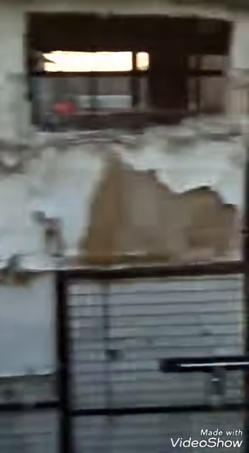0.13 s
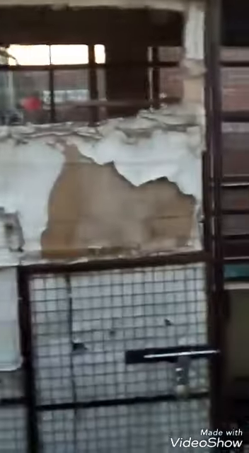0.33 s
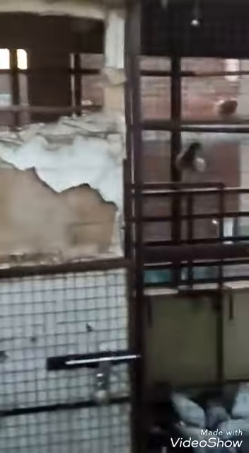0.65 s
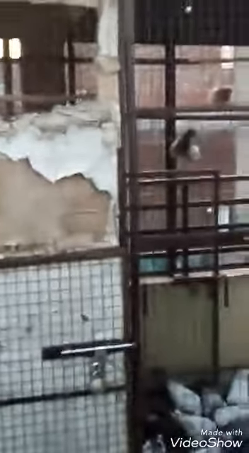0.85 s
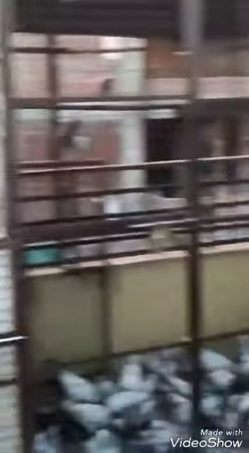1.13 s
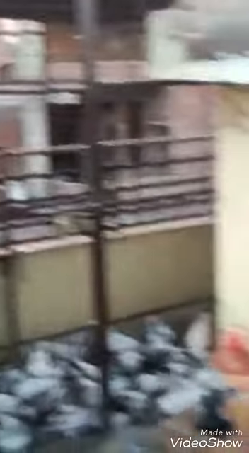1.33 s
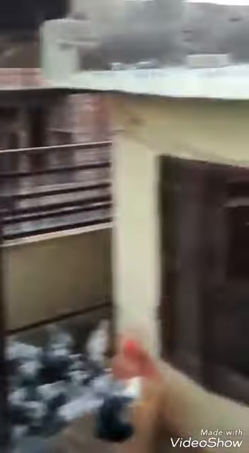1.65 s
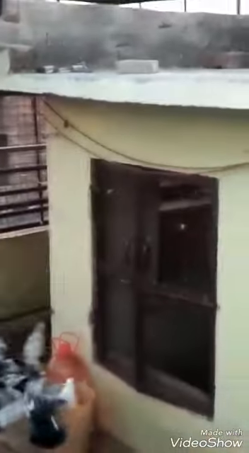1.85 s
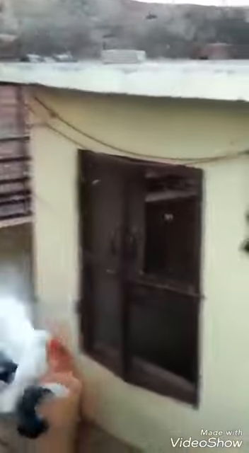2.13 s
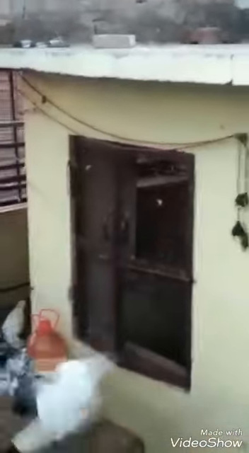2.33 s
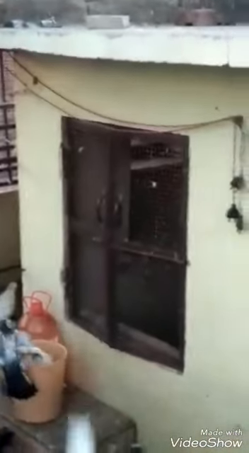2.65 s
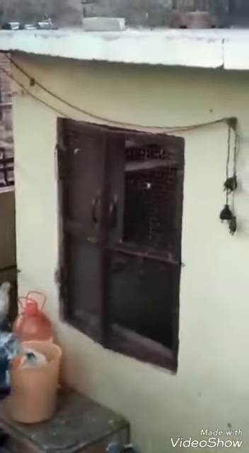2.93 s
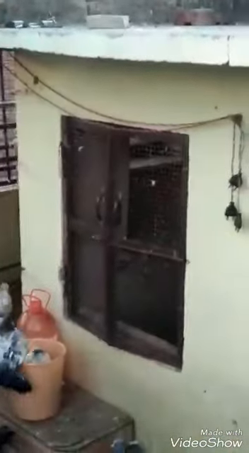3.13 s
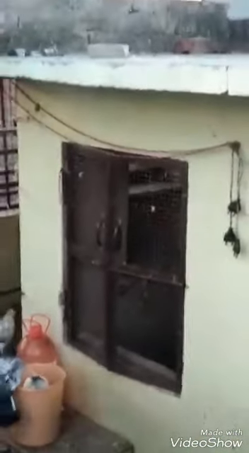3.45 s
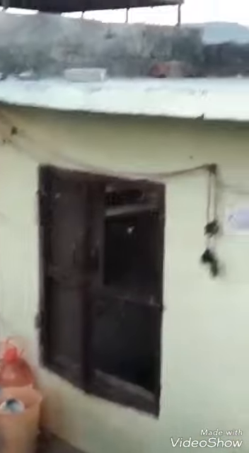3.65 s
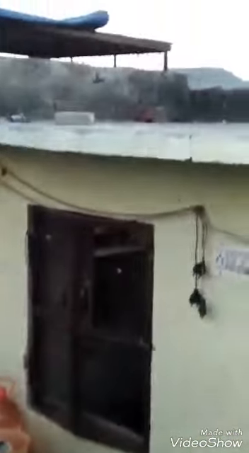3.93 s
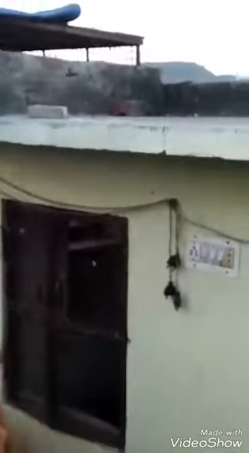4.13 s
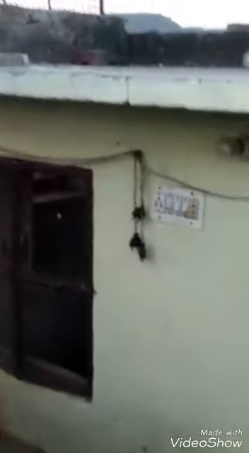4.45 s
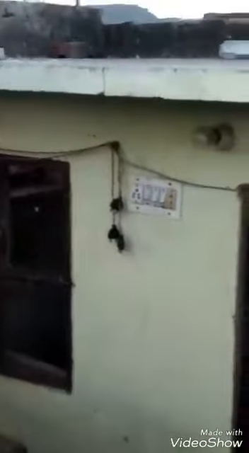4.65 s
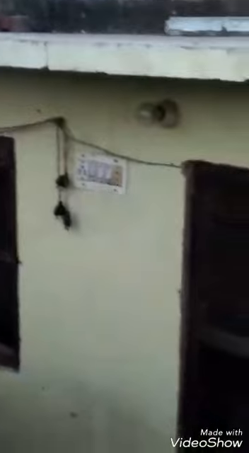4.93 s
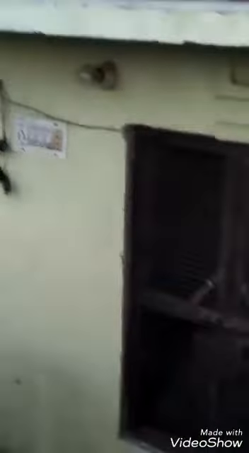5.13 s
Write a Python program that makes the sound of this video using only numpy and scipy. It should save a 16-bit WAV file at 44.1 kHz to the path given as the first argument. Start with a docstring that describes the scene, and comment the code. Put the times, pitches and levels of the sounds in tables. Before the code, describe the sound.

On a walled roof terrace, a pigeon utters a throbbing coo at about half a second, then a hoarser, quieter one near two seconds amid metallic ticks and wing beats. Light wing claps follow. A third coo comes with more flapping, and a last, loudest coo closes the clip. Soft murmur and town rumble lie behind; a handheld microphone catches low air thumps.

```python
"""Pigeons cooing on a walled roof terrace: four throbbing coos, built from one oscillator let through in throbs.
Single throbs, short gliding tones and beak rasps join them. Wing claps are shaped noise, with flutter and ticks;
their downstrokes push single low swings of air at the microphone. Stick-slip scrapes ring a piece of metal.
Behind lie a throbbing murmur, rustling feathers and the noise of the town, with echoes off the walls."""
import sys
import numpy as np
from scipy import signal
from scipy.fft import rfft, irfft, next_fast_len
from scipy.io import wavfile

SR = 44100
rng = np.random.default_rng(int(sys.argv[2]) if len(sys.argv) > 2 else 0)


def generate_wav(signal):
    """Clip the signal to [-1, 1] and save it as 16-bit WAV at the path in sys.argv[1]."""
    frames = np.transpose(np.atleast_2d(signal))
    scaled = np.clip(frames, -1, 1) * 32767
    pcm = np.round(scaled).astype(np.int16)
    wavfile.write(sys.argv[1], SR, pcm)


N = 233685
TIME = np.arange(N) / SR

# Levels in the tables stand before the trims in the functions; colours are relative, as noise is set to rms 1.
# coos of the nearest birds: start_s, loudest_s, end_s, level_db, rise_db, pitch_hz, first_throbs_per_s,
#   quickening_per_s2, top_throbs_per_s, throb_length_s, roughness (0-1), wheeze_db, creak_hz, glide_hz_per_s
COO_ROWS = [(0.549, 0.831, 1.151, -21.5, 13, 334, 30.6, 38, 48, 0.01595, 0.45, -27.5, 98, -44.5),
            (1.98, 2.19, 2.485, -29, 10, 350, 26.9, 77, 29, 0.029, 0.93, -21, 142, -41),
            (3.405, 3.784, 4.08, -23.5, 10, 321.9, 15.3, 68, 42, 0.019, 0.21, -54, 119.6, -24.5),
            (4.922, 5.25, 5.74, -14, 10, 344.6, 18.1, 60, 32.7, .015, 0.33, -51.5, 98.64, 40)]
# effort arch of a coo: it rises, levels off and sinks by FADE_DB
FADE_DB, RISE_SHAPE, FADE_SHAPE = 16.5, 1.935, 1.373
# per dB of slack, a throb is lower, smoother, slightly wheezier and shorter (log length)
PITCH_HZ_PER_DB, ROUGH_PER_DB, WHEEZE_PER_DB, LENGTHEN_PER_DB = 2.0, -0.05, 0.08, -0.0339
# no two throbs are alike (length: spread of its logarithm)
THROB_SPREAD_DB, THROB_SPREAD_HZ, THROB_SPREAD_S, THROB_SPREAD_LENGTH = 1.1, 10.92, .0012, 0.1507
# single throbs, within the coos or between them, smooth to hoarse: middle_s, level_db, pitch_hz, length_s,
#   roughness (clipped to 0-1 in the voice)
SINGLE_THROBS = [(.01, -35, 382, 0.03, 1), (0.293, -39, 263.3, 0.023, 0.4),
                 (0.353, -35.5, 372.6, 0.033, 1.2), (0.53, -33.5, 452.5, 0.015, 1.2),
                 (1.181, -36.5, 400, 0.0097, 0.74), (1.206, -40, 415.6, 0.081, 1),
                 (1.696, -35.5, 449.2, 0.023, 0.1), (1.83, -42, 289.8, 0.037, 0.75),
                 (1.858, -26.5, 471, .015, 0.42), (1.904, -29, 493, .014, 0.8),
                 (2.046, -30.5, 342.8, 0.017, 0.6), (2.132, -30, 350, 0.018, 0.6),
                 (2.219, -30, 353.5, 0.013, 0.7), (2.255, -28.5, 456, 0.015, 0.4),
                 (2.33, -33, 331.4, 0.026, 0.73), (2.385, -30.5, 312, 0.018, 1.2),
                 (2.526, -35, 474.5, .04, .8), (2.623, -37.5, 310, 0.015, 0.92),
                 (3.225, -35.5, 353.5, 0.025, 0.86), (3.975, -22.5, 299.6, 0.011, 0.4),
                 (4.041, -32.5, 346, .02, 0.6), (4.087, -36, 239.3, 0.021, 0.65),
                 (4.662, -40.5, 300.8, 0.059, 0.4), (4.749, -27.5, 410, .016, 0.51),
                 (4.896, -40, 311.2, 0.028, 0.7), (4.951, -32, 440, 0.019, 0.73),
                 (5.274, -17, 387.5, 0.0117, 0.23)]
SINGLE_WHEEZE_DB, SINGLE_CREAK_HZ = -44.5, 99.83
# breathy noise of an open beak: freq_hz, level_db
WHEEZE_COLOUR = [(800, -31.5), (1080, -5), (1230, -6), (1420, 19), (1650, 9), (1900, -11), (2300, -2.5),
                 (3400, -10), (3900, -27.5), (4500, -49.5), (7000, -47.5)]
# low rasp in a rough voice: freq_hz, level_db
RASP_COLOUR = [(110, -47.0), (200, 6.5), (300, 8.0), (450, -6.5), (600, -13.0), (800, -28), (2000, -68.5)]
# short gliding tones (overtones of the coos, grumbles, hoots and squeaks): middle_s, length_s, pitch_hz,
#   glide_octaves_per_s, level_db, waver (share of the pitch)
GLIDING_TONES = [(.26, 0.094, 166, 5.5, -43.5, 0.26), (0.367, 0.21, 2154, 2, -55.5, 0.085),
                 (0.385, 0.028, 756, -1, -38, 0.03), (0.452, 0.11, 446, 0.5, -47, 0.038),
                 (0.653, 0.034, 1047, 1.5, -45.5, 0.022), (0.794, 0.082, 1348, -1, -49.5, 0.05),
                 (1.261, 0.059, 1007, 0.5, -43.5, 0.07), (1.964, 0.059, 478, -2, -34.5, 0.045),
                 (2.07, .04, 1140, 1, -37, 0.016), (2.124, .075, 1366, -1.8, -44, 0.0052),
                 (2.197, .04, 1500, 1.5, -46, 0.023), (2.202, 0.049, 1106, 0, -43.5, 0.056),
                 (2.21, 0.1078, 470, -1, -36.5, 0.082), (2.397, 0.04, 1500, -1, -39, 0.01),
                 (2.775, .073, 786, 0, -45, 0.074), (3.087, 0.17, 638, -0.5, -43.5, 0.066),
                 (3.716, 0.041, 476.6, -.5, -35, .04), (3.756, 0.017, 717.4, 12, -37.5, 0.031),
                 (4.542, .03, 771, -2.5, -53.5, 0.027), (4.608, 0.093, 260, -3, -43.5, 0.28),
                 (4.821, 0.034, 1778, 0, -59, 0.012)]
# rasping bursts from open beaks: middle_s, length_s, centre_hz, half_width (share of the centre), level_db
RASP_ROWS = [(0.687, .035, 2250, 0.17, -56.5), (0.719, 0.025, 3260, 0.088, -61.5),
             (0.788, 0.031, 2950, 0.11, -60), (0.832, 0.024, 2940, 0.11, -57.5),
             (0.868, 0.032, 1847, 0.13, -56.5), (1.962, 0.011, 2300, 0.072, -40.5),
             (2.021, .022, 2179, 0.14, -50), (2.074, 0.029, 2320, 0.087, -52), (2.134, .02, 2480, .15, -52),
             (2.22, 0.068, 3297, .12, -60), (2.266, 0.029, 2560, 0.17, -51.5)]
# wing claps: start_s, level_db, body_db (against the crack), decay_s, top_db (against the crack), rise_s,
#   snap_hz, snap_db (against the crack)
CLAP_ROWS = [(2.3873, -44, -9, 0.0063, 6.5, 0.0051, 2500, 12.5),
             (2.514, -35, -8.5, 0.0066, 3, 0.0031, 1870, 0.5),
             (2.644, -36.5, -1.5, 0.0053, 6, 0.00081, 3110, -13),
             (3.56, -45.5, -9, 0.01, 6.5, 0.0058, 2826, -10), (3.694, -48, 1, .0098, 13, 0.005, 2370, 10),
             (3.83, -52.5, -16, 0.009, -1, .002, 2103, 12),
             (3.964, -39, -6, 0.0081, 9.5, 0.0013, 2950, 6.5),
             (4.0983, -33.5, -3.5, 0.003, 8.5, 0.00082, 2700, -16),
             (4.168, -52.5, 13, 0.018, 1.5, 0.0055, 1900, 6),
             (4.2201, -40, 6, 0.0063, 12.5, 0.0012, 3140, 5.5),
             (4.36, -51.5, 0.5, 0.007, -13, 0.0047, 1450, 6),
             (4.516, -45.5, -15, 0.027, -4, 0.0016, 1960, 1),
             (4.659, -46.5, 7, 0.012, 3, 0.0095, 2140, 8.5)]
# quills striking together: freq_hz, level_db
QUILL_COLOUR = [(530, -11), (900, -17.5), (1290, -4), (1450, 0), (1630, -6), (1950, 3), (2480, 2.5),
                (2960, 1.5), (4390, -5.5), (5700, -8), (8750, -25), (13100, -18.5), (14800, -22),
                (15500, -59)]
# trapped air popping out: freq_hz, level_db
POP_COLOUR = [(60, -15.0), (150, 14), (600, 6.0), (1000, -3.0), (1800, -42), (4000, -52.0)]
# feathers fluttering through the air: middle_s, length_s, level_db
FLUTTER_ROWS = [(1.9, 0.019, -53), (2.42, 0.034, -56), (2.495, 0.031, -55.5), (2.57, 0.061, -57),
                (3.74, .06, -62), (3.87, 0.071, -71), (4.01, 0.046, -60.5), (4.125, 0.025, -59),
                (4.175, 0.016, -62), (4.33, 0.03, -80), (4.47, 0.052, -73), (4.55, 0.057, -56.5),
                (4.68, 0.098, -56)]
# hiss of spread flight feathers: freq_hz, level_db
FLUTTER_COLOUR = [(800, -13), (1600, 2), (2400, 6.0), (3500, 3.0), (4400, -6), (5400, 1.0), (7000, -29),
                  (9500, -31.0), (13200, -1.5), (15500, -31)]
# birds flying past the microphone: first_stroke_s, last_stroke_s, stroke_s, first_db, last_db, swing_hz
FLIGHT_ROWS = [(1.293, 1.998, .142, -42, -30.5, 25.8), (3.509, 3.915, .135, -30, -35, 31)]
# single close puffs of air: middle_s, peak_db, swing_hz
PUFF_ROWS = [(2.025, -30.5, 36.5), (3.367, -39, 42.3), (3.546, -32.5, 27.5), (4.174, -28.5, 37.3),
             (4.213, -27.5, 45.2), (4.248, -30.5, 100), (4.403, -39.5, 25.3), (4.602, -37, 58.4),
             (4.788, -37, 45.9)]
# eddies of stirred air: middle_s, length_s, level_db
EDDY_ROWS = [(2.18, 0.3, -40), (3.69, .12, -34.5), (4.68, 0.24, -46)]
STILL_AIR_DB = -60.5
# moving air at the microphone: freq_hz, level_db
DRAUGHT_SPECTRUM = [(20, -10), (32, 10.5), (60, -9), (100, -28), (200, -22.5), (500, -85.5)]
# scrapes on metal: start_s, level_db, rise_s, decay_s, grit_db (against the ring),
#   unevenness (share of the slip rate), bend_octaves, glide_octaves_per_s
SCRAPE_ROWS = [(.351, -48, .003, 0.018, -28, .1, -0.0037, -2.5),
               (1.234, -53, 0.0036, 0.055, -6, .15, -0.038, -1),
               (1.567, -40.5, 0.0029, 0.022, 1.5, .15, -0.0074, 2),
               (1.590, -32, 0.00058, 0.01, -17, 0.016, 0.0056, -1),
               (1.924, -38.5, 0.0035, 0.009, -10, 0.025, 0.031, -2.5),
               (1.942, -35, .002, 0.0036, -9, 0.11, -0.015, 1.5),
               (1.958, -45, 0.0025, 0.044, -4.5, 0.18, .05, -5.5),
               (2.029, -50, .004, .03, -6, .15, 0.026, -1.5),
               (2.316, -45.5, .004, 0.011, -24, 0.059, -0.044, -1),
               (4.283, -50, 0.0017, 0.0058, 7, .2, -0.058, -7)]
# resonances of the metal: freq_hz, width_hz, level_db
METAL_MODES = [(1102, 79, 0.5), (1240, 168.6, -2.5), (2020, 140, -17), (2970, 820, -24), (3640, 240, -19),
               (5290, 110, -24.5)]
# grit shed by the slips: freq_hz, level_db
GRIT_COLOUR = [(600, -42), (1050, 3), (1350, 6), (2100, 4), (2600, -3), (3300, 1.5), (3900, -12),
               (4500, -7.5), (5300, -20), (6500, -21), (8000, -48), (14000, -62)]
SLIPS_PER_S = 160
GRIT_PULSING = .8   # depth of the grit's pulsing in step with the slips
# level of the background murmur and rustle, sinking late: time_s, level_db
BACKGROUND_LEVEL = [(0.0, -53.5), (0.31, -57.5), (0.56, -50.5), (1.03, -54), (1.87, -53.5), (2.09, -50.5),
                    (2.45, -55), (3.07, -51.5), (3.84, -57), (4.13, -64.5), (4.34, -73.5), (4.97, -61.5),
                    (5.15, -61.5), (5.3, -73.5)]
# higher throbbing haze over the coos: middle_s, length_s, level_db, pitch_hz
HAZE_ROWS = [(0.669, 0.13, -35, 538.5), (0.903, 0.15, -44, 511.6), (1.201, 0.063, -40, 480),
             (2.116, 0.17, -35, 612.4), (2.394, 0.057, -40, 581.4), (3.448, 0.069, -40, 469),
             (3.842, 0.056, -40.5, 447.6), (3.961, 0.17, -42.5, 633.6), (5.013, 0.098, -37.5, 587.6),
             (5.221, 0.16, -40, 478)]
# birds shuffling their feathers: middle_s, length_s, level_db
SHUFFLE_ROWS = [(.37, 0.17, -56), (2.03, 0.029, -52), (2.62, 0.13, -52.5), (3.13, 0.099, -61),
                (4.17, 0.045, -53), (4.67, 0.027, -48)]
# rustling plumage: freq_hz, level_db
RUSTLE_COLOUR = [(600, -17.5), (800, 19), (1100, 14), (1450, 12), (1800, 3), (3200, -24), (4500, -56),
                 (8000, -59)]
# rumble of the town around: time_s, level_db
RUMBLE_LEVEL = [(0.0, -57), (0.38, -55), (0.94, -55.5), (1.14, -59.5), (1.83, -53.5), (1.96, -50),
                (2.24, -56), (2.571, -58), (3.25, -55.5), (3.63, -54), (4.49, -70), (4.71, -52.5),
                (4.99, -65), (5.3, -62.5)]
# the same rumble's spectrum: freq_hz, level_db
RUMBLE_COLOUR = [(35, -36.5), (60, 5), (97, 0), (149, -4.5), (264, -0.5), (331, -5), (382, -8),
                 (428, -16.5), (493, -7), (1020, -25), (1800, -48.5), (2340, -61), (3960, -120)]
# hiss of the town around: time_s, level_db
HISS_LEVEL = [(0.0, -57), (0.8, -54.5), (1.37, -58.5), (1.92, -53.5), (2.08, -55), (2.52, -56.5),
              (2.79, -57.5), (4.21, -53.5), (4.31, -57.5), (5.3, -59)]
# the same hiss's spectrum: freq_hz, level_db
HISS_COLOUR = [(880, -34.5), (1500, -8), (1820, -6.5), (2400, -10), (2520, -13), (2830, -11), (3480, -11.5),
               (4310, -16), (5450, -17), (6430, -32), (9230, -34), (13400, -31.5), (15500, -35.5)]
# how long the walled terrace takes to die away by 60 dB: freq_hz, decay_s
TERRACE_DECAY = [(100, 0.22), (400, 0.18), (1500, 0.15), (4000, 0.14), (14000, 0.13)]
CUTOFF_HZ = 15300


def from_db(db):
    """Decibels to gain."""
    return 10 ** (np.asarray(db) / 20)


def rms_one(x):
    """Scale to unit power."""
    return x / np.sqrt(np.mean(x ** 2) + 1e-20)


def in_time(rows):
    """Each column of a curve at every sample."""
    s, *columns = np.transpose(rows)
    return [np.interp(TIME, s, column) for column in columns]


def at_hz(points, hz):
    """Read a spectrum on a log-frequency axis."""
    freq_hz, value = np.transpose(points)
    return np.interp(np.log(np.maximum(hz, 1)), np.log(freq_hz), value)


def band(x, low_hz, high_hz):
    """Causal band-pass."""
    edges = [low_hz, min(high_hz, SR / 2 - 1)]
    return signal.sosfilt(signal.butter(2, edges, "band", fs=SR, output="sos"), x)


def one_sided(x, order, hz, kind):
    """Low-pass or high-pass."""
    return signal.sosfilt(signal.butter(order, hz, kind, fs=SR, output="sos"), x)


def noise(spectrum):
    """Noise of a given colour, rms 1."""
    size = next_fast_len(N)
    gain = from_db(at_hz(spectrum, np.fft.rfftfreq(size, 1 / SR)))
    return rms_one(irfft(rfft(rng.standard_normal(size)) * gain, size)[:N])


def drift(rate):
    """Smooth random wandering with spread 1; a higher rate (Hz) wanders faster."""
    r = np.exp(-2 * np.pi * rate / SR)
    # the first second lets the filter settle
    return rms_one(signal.lfilter([1], [1, -2 * r, r * r], rng.standard_normal(N + SR))[SR:])


def turning(hz):
    """Phase of a tone whose pitch varies."""
    return 2 * np.pi * np.cumsum(hz) / SR


def swell(t, length, squareness=2):
    """A rounded swell about t = 0, of the given length at half height."""
    return .5 ** (np.abs(2 * t / length) ** squareness)


def swells(rows):
    """Gain of a row of rounded swells."""
    return sum(from_db(db) * swell(TIME - s, length) for s, length, db, *_ in rows)


def burst(s, rise, decay, hold):
    """An exponential rise meets an exponential decay; a longer hold delays the decay."""
    t = TIME - s
    return np.exp(np.clip(np.minimum(t / rise, (hold - t) / decay), -40, 0))


def near(s, reach):
    """The samples within reach of a moment."""
    return slice(max(0, int((s - reach) * SR)), max(0, int((s + reach) * SR)))


def ring(clicks, hz, t60):
    """A unit click sets a sine of height 1 ringing, down 60 dB after t60 seconds."""
    r = from_db(-60 / (t60 * SR))
    w = 2 * np.pi * hz / SR
    return signal.lfilter([0, np.sin(w)], [1, -2 * r * np.cos(w), r * r], clicks + 1e-18)


def coos(second_db=-32, third_db=-48, rasp_db=-12, above_db=-2, next_above_db=-11, below_db=-14,
         rattle_db=3, bass_cut_hz=210):
    """The swollen crop passes little but the fundamental; a rough voice adds creak and rasp."""
    throbs = all_throbs()
    rough, beak_db, creak_hz = in_time([(s, rough, wheeze, creak) for s, *_, rough, wheeze, creak in throbs])
    rough = np.clip(rough, 0, 1)
    strength, phase = throat(throbs, fall=0.074, jitter=0.03515 * rough, squareness=2.6, lean=.7)
    tone = np.sin(phase) + from_db(second_db) * np.sin(2 * phase) + from_db(third_db) * np.sin(3 * phase)
    cycle = turning(creak_hz * (1 + 0.1088 * drift(52.0)))
    # the creak splits off partials on both sides; the resonance of the crop favours the upper ones
    upper = from_db(above_db) * np.sin(phase + cycle)
    upper += rough * from_db(next_above_db) * np.sin(phase + 2 * cycle)
    creak = band(upper - from_db(below_db) * np.sin(phase - cycle), 190, 570)
    rasp = from_db(rasp_db) * noise(RASP_COLOUR)
    wheeze = from_db(beak_db) * noise(WHEEZE_COLOUR) * (1 + rough * np.cos(cycle))
    wheeze *= from_db(rattle_db * drift(35))
    voice = strength * (tone + wheeze + rough * (creak + rasp)) / np.sqrt(1 + rough ** 2 / 2)
    return one_sided(voice, 3, bass_cut_hz, "high")   # a small body radiates little bass


def throat(throbs, fall, jitter, squareness, lean):
    """One oscillator let through in throbs that open fast and sag in pitch; gives strength and phase."""
    power, pull = np.full(N, 1e-14), np.zeros(N)
    for s, db, hz, length, *_ in throbs:
        span = near(s, 2 * length)
        t = TIME[span] - s
        edge = np.where(t < 0, squareness + lean, squareness - lean)
        throb = (from_db(db) * swell(t, length, edge)) ** 2
        power[span] += throb
        pull[span] += throb * hz * (1 - fall * np.tanh(2 * t / length))
    # where throbs overlap, the stronger one decides the pitch
    pitch = pull / power * (1 + jitter * drift(174))
    return np.sqrt(power), turning(pitch)


def slack_db(t, start, loudest, end, rise_db):
    """How far the effort of a coo lies under its peak."""
    before = np.maximum((loudest - t) / (loudest - start), 0)
    after = np.maximum((t - loudest) / (end - loudest), 0)
    return rise_db * before ** RISE_SHAPE + FADE_DB * after ** FADE_SHAPE


def all_throbs(count=40):
    """A coo is a quickening run of throbs under one arch of effort; single throbs join the runs."""
    # each row: middle_s, level_db, pitch_hz, length_s, roughness, wheeze_db, creak_hz
    rows = [(*single, SINGLE_WHEEZE_DB, SINGLE_CREAK_HZ) for single in SINGLE_THROBS]
    for (start, loudest, end, db, rise_db, hz, slow, quicken, fast, length,
         rough, wheeze_db, creak_hz, glide) in COO_ROWS:
        beats = np.cumsum(np.minimum(slow + quicken * TIME, fast)) / SR
        times = start + np.interp(np.arange(count), beats, TIME)
        chances = rng.standard_normal(size=(count, 4))
        for s, (later, louder, higher, longer) in zip(times[times < end], chances):
            slack = slack_db(s, start, loudest, end, rise_db)
            pitch = hz + glide * (s - loudest) - PITCH_HZ_PER_DB * slack
            rows.append((s + THROB_SPREAD_S * later,
                         db - slack + THROB_SPREAD_DB * louder,
                         pitch + THROB_SPREAD_HZ * higher,
                         length * np.exp(LENGTHEN_PER_DB * slack + THROB_SPREAD_LENGTH * longer),
                         rough + ROUGH_PER_DB * slack,
                         wheeze_db + WHEEZE_PER_DB * slack,
                         creak_hz))
    return np.array(sorted(rows))


def gliding_tones():
    """Short gliding sines, from overtones of the coos to squeaks; the more they waver, the hoarser they are."""
    out = np.zeros(N)
    unsteady = drift(86.3)
    for s, length, hz, glide, db, waver in GLIDING_TONES:
        span = near(s, 2 * length)
        t = TIME[span] - s
        phase = turning(hz * 2 ** (glide * t) * (1 + waver * unsteady[span]))
        out[span] += from_db(db) * swell(t, length) * np.sin(phase)
    return out


def rasps(rattle_per_s=130, rattle=0.26):
    """Air rattles through the open beak: pulsed noise in one broad resonance, which shifts from burst to burst."""
    pulses = 1 + rattle * np.cos(turning(rattle_per_s * (1 + .15 * drift(49.3))))
    air = rng.standard_normal(N) * pulses
    out = np.zeros(N)
    for s, length, hz, width, db in RASP_ROWS:
        resonance = rms_one(band(air, hz / (1 + width), hz * (1 + width)))
        out += from_db(db) * swell(TIME - s, length) * resonance
    return out


def wing_claps(crack_db=-2, body_db=-4, snap_db=-3.0, grain_db=1.5, contact=0.0051, snap_s=0.0024,
               snap_width=0.15, top_hz=4500, stroke_db=-22, stroke_s=0.03):
    """Quills crack together with a snap of their own pitch, trapped air pops, and the feathers swish."""
    crack, top, pop, snaps = np.zeros((4, N))
    for s, db, body, decay, sharp, rise, snap_hz, snap in CLAP_ROWS:
        swish = from_db(stroke_db) * swell(TIME - s - .026, stroke_s)   # feathers cut the air
        hit = from_db(db) * (burst(s, rise, decay, contact) + swish)
        crack += hit
        top += from_db(sharp) * hit
        pop += from_db(db + body) * burst(s, rise, 0.013, contact)
        low_hz, high_hz = snap_hz / (1 + snap_width), snap_hz * (1 + snap_width)
        pocket = rms_one(band(rng.standard_normal(N), low_hz, high_hz))
        snaps += from_db(db + snap + snap_db) * burst(s, 0.00062, snap_s, snap_s) * pocket
    quills = noise(QUILL_COLOUR)
    # dull and bright halves flicker independently
    dull = one_sided(quills, 3, top_hz, "low") * from_db(grain_db * drift(330))
    bright = one_sided(quills, 3, top_hz, "high") * from_db(grain_db * drift(330))
    cracks = from_db(crack_db) * (crack * dull + top * bright)
    return cracks + from_db(body_db) * pop * noise(POP_COLOUR) + snaps


def flutters(level_db=-3.5, flicker_db=1.5, flicks_per_s=70):
    """Spread flight feathers hiss unevenly through the air."""
    flicker = from_db(level_db + flicker_db * drift(flicks_per_s))
    return flicker * swells(FLUTTER_ROWS) * noise(FLUTTER_COLOUR)


def crackle(ticks_per_s=900, spread_db=3, low_hz=1300, high_hz=5600, cycles=14, count=14):
    """Stiff feathers flick past each other: random ticks, each ringing briefly at one of several pitches; rms 1."""
    sizes = from_db(spread_db * np.minimum(rng.exponential(1, N), 3)) * rng.choice([-1, 1], N)
    ticks = sizes * (rng.random(N) < ticks_per_s / SR)
    dealt = rng.integers(0, count, N)   # which pitch a tick gets
    pitches = np.geomspace(low_hz, high_hz, count)
    return rms_one(sum(ring(ticks * (dealt == k), hz, cycles / hz) for k, hz in enumerate(pitches)))


def feather_ticks(clap_db=-6, flutter_db=-3, lag_s=0.0054, spread_s=0.011):
    """The feathers crackle as they part after a clap, and while they flutter."""
    parting = sum(from_db(db + clap_db) * swell(TIME - s - lag_s, spread_s) for s, db, *_ in CLAP_ROWS)
    return (parting + from_db(flutter_db) * swells(FLUTTER_ROWS)) * crackle()


def wing_air():
    """Each downstroke pushes, then sucks, at the microphone; eddies swell over a faint steady draught."""
    strokes = []
    for first, last, beat, first_db, last_db, hz in FLIGHT_ROWS:
        for s in np.arange(first, last + beat / 2, beat):
            strokes.append((s, np.interp(s, [first, last], [first_db, last_db]), hz))
    out = np.zeros(N)
    for s, db, hz in strokes + list(PUFF_ROWS):
        span = near(s, 1 / hz)
        turn = 2 * np.pi * hz * (TIME[span] - s)
        out[span] -= from_db(db) * turn * np.exp((1 - turn ** 2) / 2)
    draught = from_db(STILL_AIR_DB) + swells(EDDY_ROWS)
    return out + draught * noise(DRAUGHT_SPECTRUM)


def scrapes(contact=0.01, force_db=3):
    """Metal sticks and slips: each slip knocks its resonances, and grit hisses in step."""
    out = np.zeros(N)
    unsteady, force, grit = drift(60), from_db(force_db * drift(220)), noise(GRIT_COLOUR)
    for s, db, rise, decay, gritty, uneven, bend, glide in SCRAPE_ROWS:
        span = near(s, .3)
        t = TIME[span] - s
        turns = np.cumsum(SLIPS_PER_S * (1 + uneven * unsteady[span])) / SR
        slips = np.diff(np.floor(turns), prepend=0) * force[span]
        rings = np.zeros(len(t))
        for k, (hz, width_hz, mode_db) in enumerate(METAL_MODES):
            mode = rms_one(ring(slips, hz, np.log(1000) / (np.pi * width_hz)))
            rings += (-1) ** k * from_db(mode_db) * mode   # neighbours ring in opposite sign
        grains = grit[span] * rms_one(1 + GRIT_PULSING * np.cos(2 * np.pi * turns))
        # reading the ring at a changed speed bends its pitch
        bent = np.interp(2 ** bend * t * (1 + np.log(2) * glide * t / 2), t, rings)
        out[span] += from_db(db) * burst(s, rise, decay, contact)[span] * (bent + from_db(gritty) * grains)
    return out


def throbbing_haze(pitch_hz, spread, sag, count=4, throbs_per_s=32):
    """Several voices throb over each other; each wanders and sags in pitch (both in octaves)."""
    out = 0
    for voice in range(count):
        beat = np.cumsum(throbs_per_s * (1 + 0.1754 * drift(9.91))) / SR % 1
        pitch = pitch_hz * 2 ** (spread * np.tanh(drift(12)) + sag * (.5 - beat))
        out = out + np.sin(np.pi * beat) ** 2 * np.sin(turning(pitch))
    return rms_one(out)


def murmur(background_db, blend_db=-3, haze_db=-3):
    """A throbbing blend follows the background level; a higher throbbing haze swells with the coos."""
    haze_hz, = in_time([(s, hz) for s, *_, hz in HAZE_ROWS])
    blend = from_db(background_db + blend_db) * throbbing_haze(pitch_hz=513.0, spread=0.47, sag=0.193)
    return blend + from_db(haze_db) * swells(HAZE_ROWS) * throbbing_haze(haze_hz, spread=0.26, sag=.1)


def rustling(background_db, rustle_db=-2, shuffle_db=-3):
    """Plumage rubs softly as coloured noise, swelling when birds shuffle."""
    amount = from_db(background_db + rustle_db) + from_db(shuffle_db) * swells(SHUFFLE_ROWS)
    return amount * noise(RUSTLE_COLOUR) * from_db(1.52 * drift(30))


def town(level_curve, colour, trim_db):
    """The town around blurs into coloured noise whose level wanders."""
    level_db, = in_time(level_curve)
    return from_db(level_db + trim_db) * noise(colour)


def terrace(x, first_echo=0.0088):
    """Scattered echoes off walls and roof, dying sooner in the treble."""
    t = TIME[:SR // 2]
    edges = np.geomspace(80, 18000, 9)
    echoes = np.zeros(len(t))
    for low, high in zip(edges, edges[1:]):
        decay = from_db(-60 * t / at_hz(TERRACE_DECAY, np.sqrt(low * high)))
        echoes += band(rng.standard_normal(len(t)), low, high) * decay
    echoes *= np.clip(t / first_echo - .5, 0, 1)   # fades in around the first echo
    return signal.fftconvolve(x, echoes / np.sqrt(np.sum(echoes ** 2)))[:N]


def scene(coo_wet_db=-15, hit_wet_db=-6, width_db=-16, low_width_db=-9):
    """Birds, walls and town, almost in mono: a faint side of echoes, led by the treble of hits and hiss."""
    background_db, = in_time(BACKGROUND_LEVEL)
    voices = coos() + gliding_tones() + rasps()
    hits = wing_claps() + flutters() + feather_ticks() + scrapes()
    feathers = rustling(background_db)
    low = murmur(background_db) + town(RUMBLE_LEVEL, RUMBLE_COLOUR, trim_db=5.5) + wing_air()
    air = town(HISS_LEVEL, HISS_COLOUR, trim_db=-6.5)
    echoes = terrace(from_db(coo_wet_db) * voices + from_db(hit_wet_db) * hits)
    mid = voices + hits + low + feathers + air + echoes
    spread = band(hits + air, 1500, 18000) + from_db(low_width_db) * (low + feathers) + .06 * voices
    side = from_db(width_db) * terrace(spread)
    return np.array([mid + side, mid - side])


def record(dry, notch_hz=4550, notch_q=9):
    """The microphone port leaves a narrow notch; the top is cut steeply."""
    coloured = signal.lfilter(*signal.iirnotch(notch_hz, notch_q, fs=SR), dry)
    return signal.sosfilt(signal.ellip(10, .1, 80, CUTOFF_HZ, fs=SR, output="sos"), coloured)


dry = scene()
out = record(dry)
generate_wav(out)
```